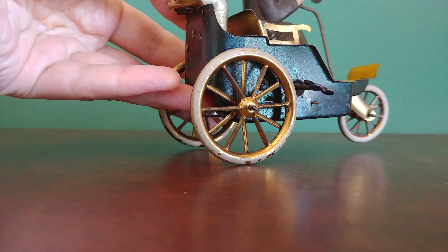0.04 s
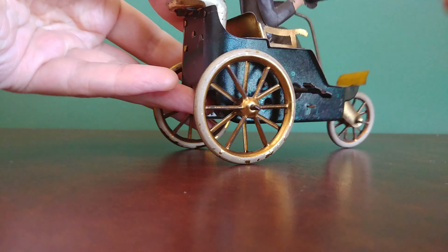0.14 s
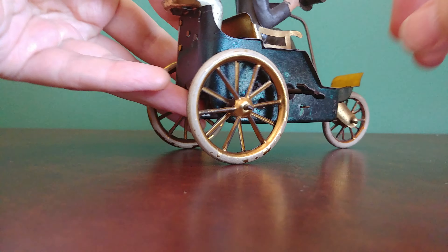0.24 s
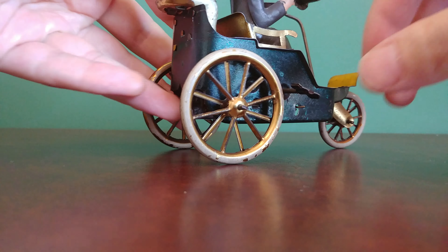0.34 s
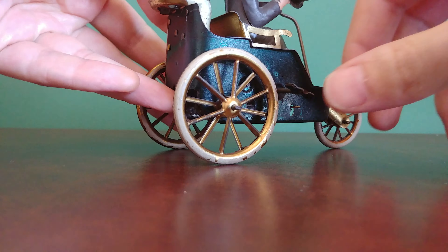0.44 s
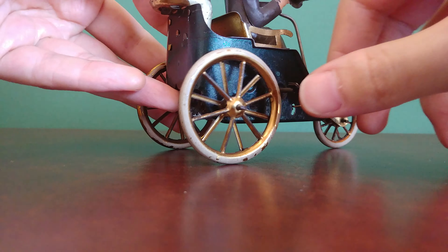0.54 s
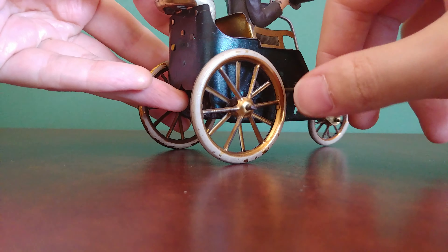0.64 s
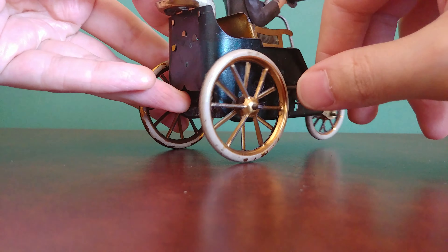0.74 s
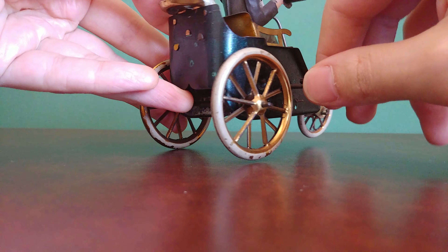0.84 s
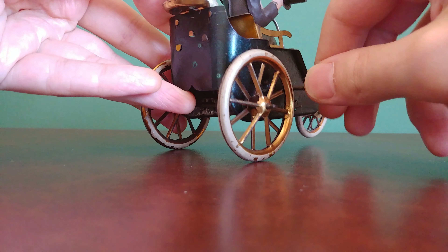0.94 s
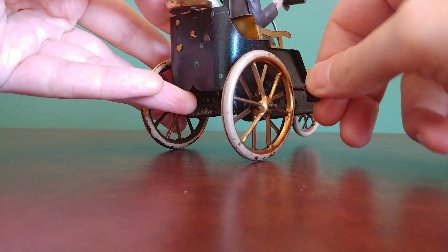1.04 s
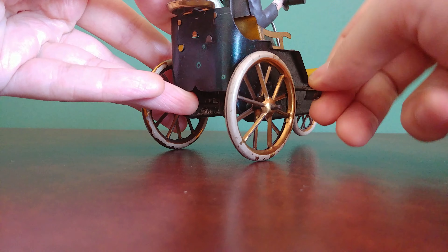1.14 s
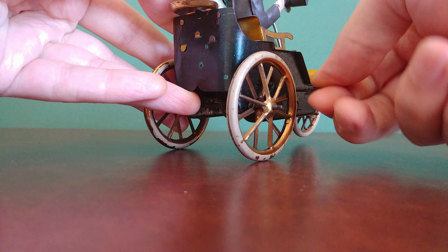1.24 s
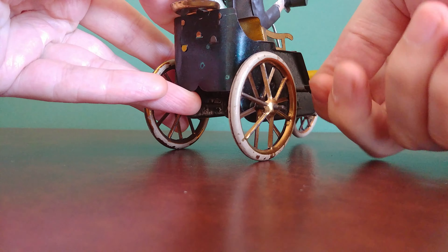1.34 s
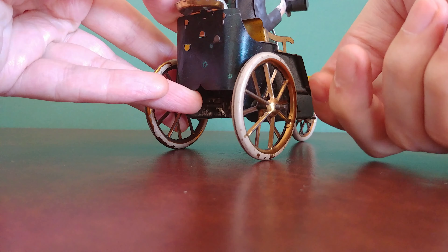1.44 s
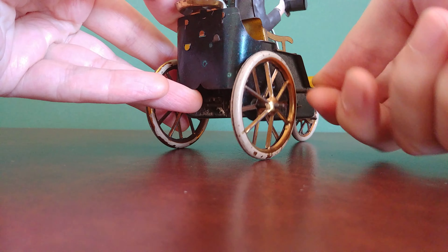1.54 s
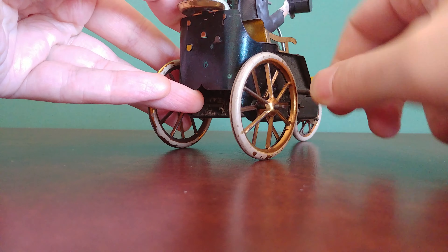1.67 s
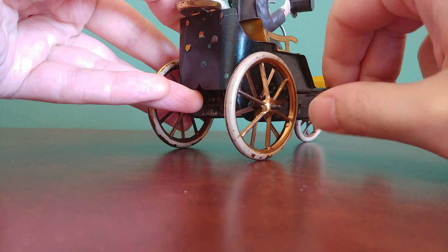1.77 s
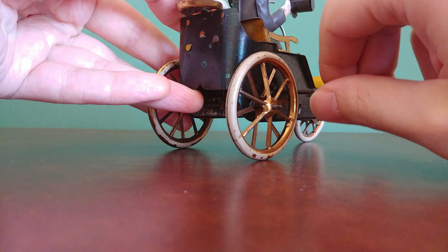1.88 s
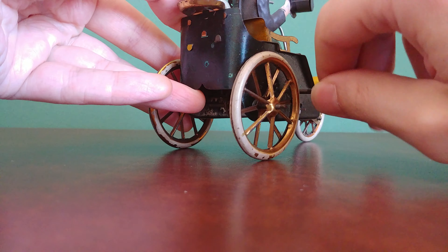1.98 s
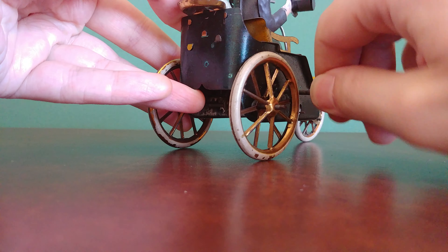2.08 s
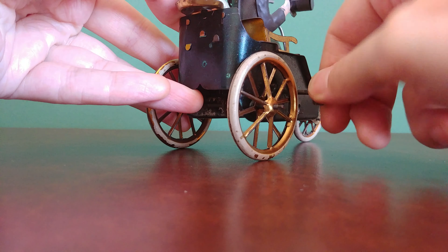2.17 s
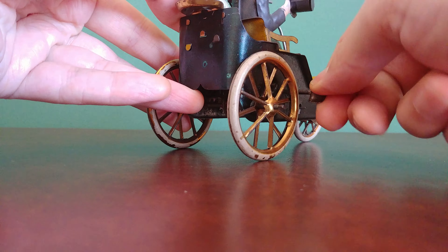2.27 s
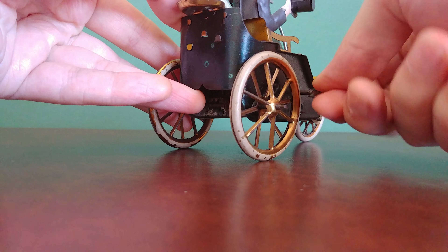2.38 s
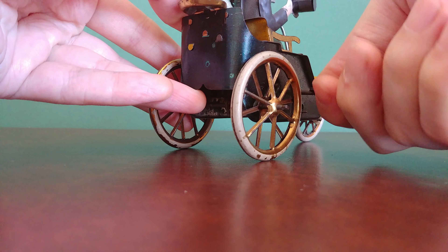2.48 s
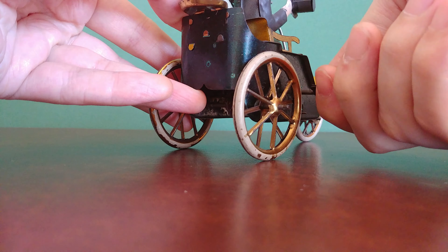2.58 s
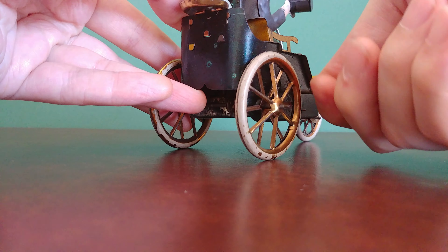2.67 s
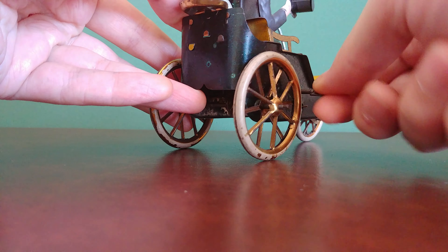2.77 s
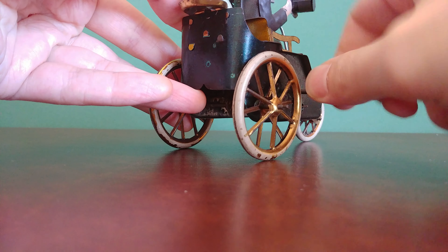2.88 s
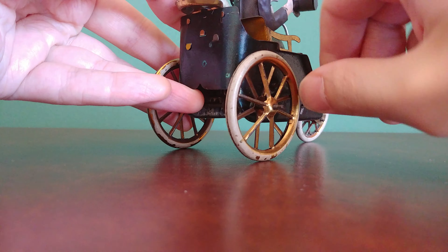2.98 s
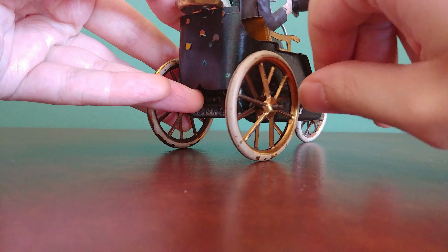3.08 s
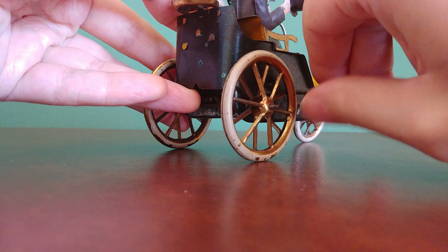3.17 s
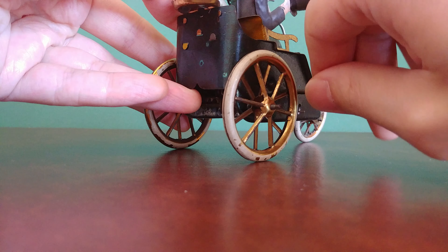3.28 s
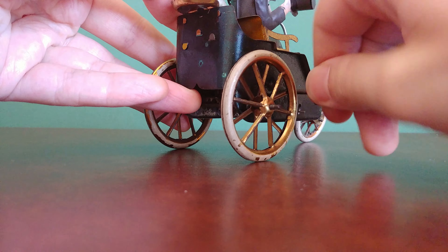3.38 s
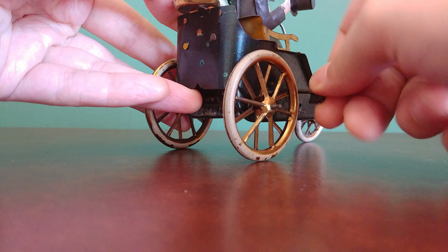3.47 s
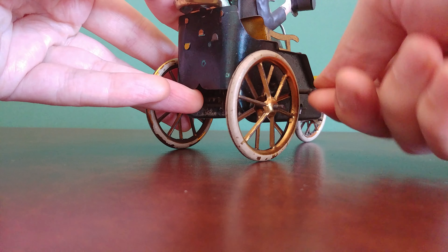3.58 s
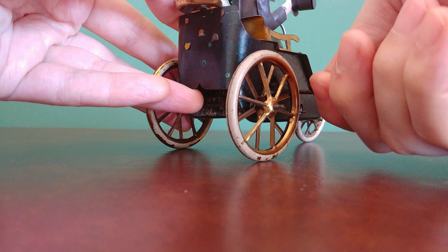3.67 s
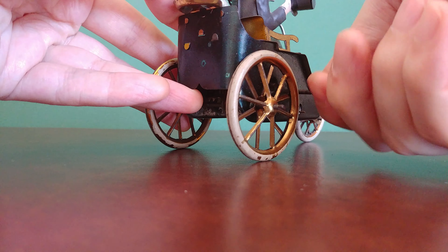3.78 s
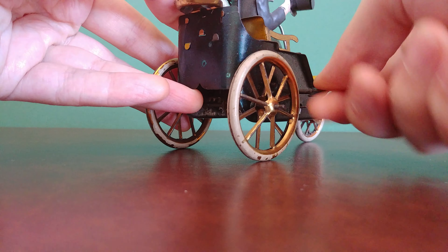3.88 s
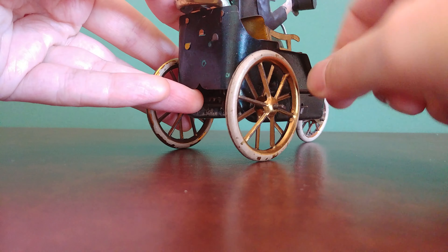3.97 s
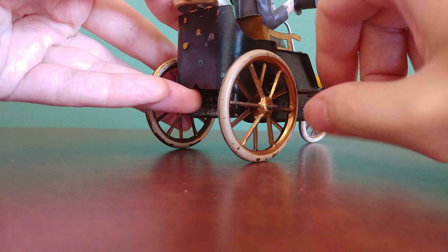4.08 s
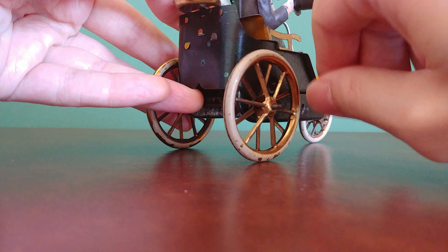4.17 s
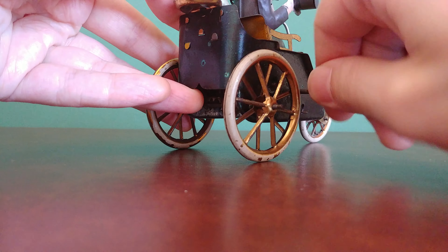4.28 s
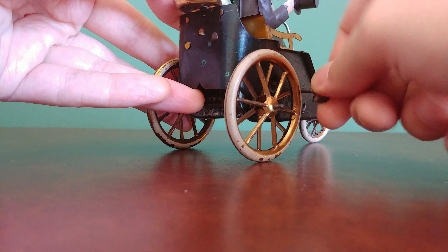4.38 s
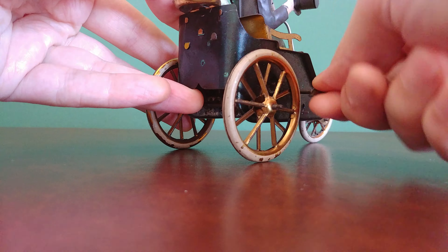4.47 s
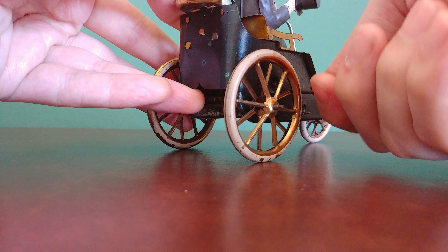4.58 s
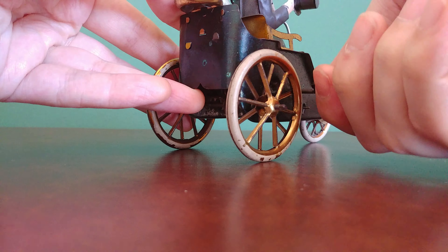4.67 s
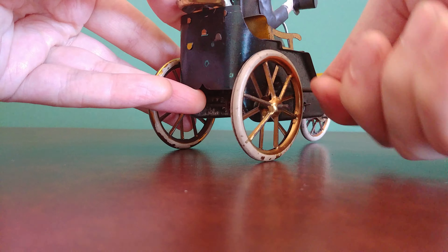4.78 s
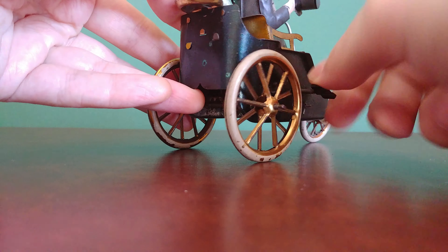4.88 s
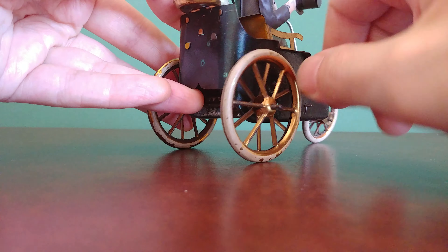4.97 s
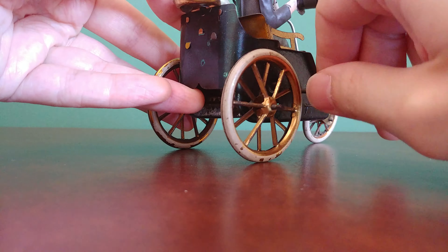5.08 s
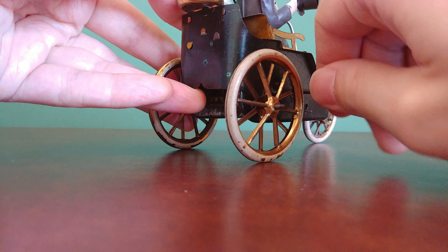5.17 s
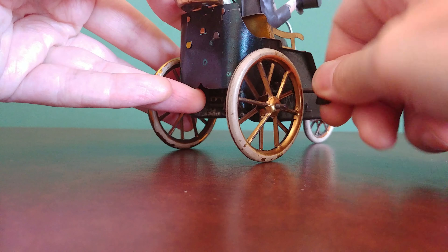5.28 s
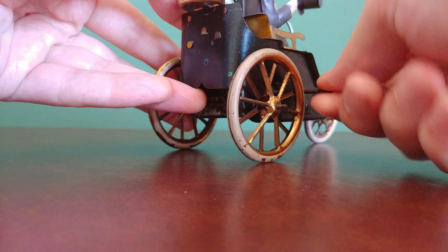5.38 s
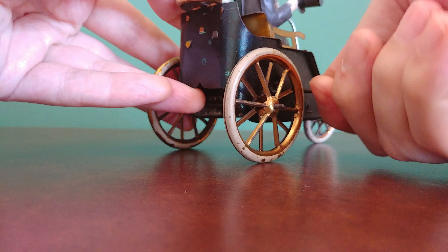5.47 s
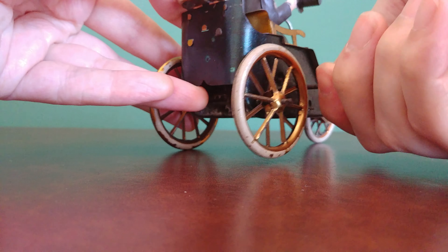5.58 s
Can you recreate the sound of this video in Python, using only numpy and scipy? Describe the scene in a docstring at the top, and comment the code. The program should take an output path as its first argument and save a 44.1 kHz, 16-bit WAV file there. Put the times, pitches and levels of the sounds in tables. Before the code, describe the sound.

Sharp ratchet clicks from a wind-up tin toy, turn after turn, with faint finger rubs, loose ticks and soft table thumps between.

```python
"""Winding up a tin toy car

A hand winds the clockwork of a small tin car that stands on a wooden table in a quiet room.
A pawl (a small catch) snaps over three or four ratchet teeth per turn; in between, fingers regrip
the key, rub the tin and make loose parts tick. Random tiny impacts ring the modes of the tin body.
Jolts ring low modes of the table; a wall echo and fading noise answer, over steady background noise.
Two close microphone ports round off the loudest peaks."""
import sys
import numpy as np
from scipy import signal
from scipy.io import wavfile

SR = 44100
rng = np.random.default_rng(int(sys.argv[2]) if len(sys.argv) > 2 else 0)


def file_out(sig):
    """Save sig as 16-bit WAV at sys.argv[1]."""
    # one column per channel
    cols = np.atleast_2d(sig).T
    # limit, then scale
    lim = np.clip(cols, -1, 1)
    pcm = np.round(lim * 32767).astype(np.int16)
    wavfile.write(sys.argv[1], SR, pcm)


N = 248283


def from_db(db):
    """Turn decibels into a gain."""
    return 10 ** (np.asarray(db) / 20)


def at_hz(points, hz):
    """Read a table of (f/Hz, value) between its points, on a log-frequency axis."""
    points = np.array(points, float)
    return np.interp(np.log(hz), np.log(np.maximum(points[:, 0], 1)), points[:, 1])


def bands(low_hz, count, per_octave):
    """Cut noise into adjacent bands: gives each centre in Hz and a pair of unrelated noises."""
    edges = low_hz * 2 ** (np.arange(count + 1) / per_octave)
    white = rng.standard_normal((2, 2, N))   # neighbouring bands take turns with two noise pairs
    for k, (low, high) in enumerate(zip(edges, edges[1:])):
        sos = signal.butter(2, [low, high], "band", fs=SR, output="sos")
        yield np.sqrt(low * high), signal.sosfilt(sos, white[k % 2])


# colour of the steady background: [f/Hz, relative level/dB per Hz]
BACKGROUND_COLOUR = [(18, -46), (30, -20), (125, 2), (212, -9), (378, -9), (1030, -20.5), (2220, -21),
                     (2470, -20.5), (2740, -25), (8090, -30.5), (10500, -70), (15200, -38.5),
                     (16500, -27.5)]
# how alike the background is in the two ports: [f/Hz, likeness from 0 to 1]
PORT_LIKENESS = [(100, 1), (500, 0.0082), (3000, 0.099)]
BACKGROUND_RMS_DB = -63.0   # before the microphone filters


def room_tone():
    """Steady noise mixed from a shared and an opposed part, so the ports agree mostly in the bass."""
    out = 0
    for hz, (mid, side) in bands(low_hz=28, count=28, per_octave=3):
        alike = at_hz(PORT_LIKENESS, hz)
        shared = np.sqrt(1 + alike) * mid
        opposed = np.sqrt(1 - alike) * side * [[1], [-1]]
        out = out + from_db(at_hz(BACKGROUND_COLOUR, hz)) * (shared + opposed)
    return from_db(BACKGROUND_RMS_DB) * out / np.sqrt(np.mean(out ** 2))


# time for the room's answer to fade by 60 dB: [f/Hz, t60/s]
ROOM_FADE = [(700, 0.22), (1800, 0.22), (4800, 0.27), (9000, 0.24), (14000, 0.16)]
# colour of the room's answer: [f/Hz, relative level/dB per Hz]
ROOM_COLOUR = [(240, -50), (400, -18), (1250, -18.5), (1530, -7.5), (3480, -1), (7580, -6), (10500, -20.5),
               (12500, -12.5), (15000, -10.5), (15700, -16.5), (16500, -44.5)]
# left port against right port, used in part here and in full for the tin: [f/Hz, level/dB]
LEFT_OVER_RIGHT = [(300, 1), (1300, 8.5), (2400, -2.5), (4400, 3.5), (8100, 11), (14000, 2)]
BUILD_UP_S = 0.0065


def room(rows, spread_db):
    """Scattered reflections of every strike: noise energy builds in a few ms and dies in each band."""
    out = 0
    at = (rows[:, 0] * SR).astype(int)
    level_db, brightness, room_db = rows[:, 1:].T
    colour_db = spread_db * rng.standard_normal((len(rows), 48))   # each strike is coloured differently
    for k, (hz, pair) in enumerate(bands(low_hz=400, count=48, per_octave=9)):
        strike_db = level_db + room_db + brightness * np.log2(hz / 4000)
        energy = np.full(N, 1e-18)
        energy[at] += from_db(strike_db + at_hz(ROOM_COLOUR, hz) + colour_db[:, k]) ** 2
        decay = from_db(-120 / (at_hz(ROOM_FADE, hz) * SR))   # energy, so twice the dB of amplitude
        build = np.exp(-1 / (BUILD_UP_S * SR))
        energy = signal.lfilter([1 - build], np.convolve([1, -decay], [1, -build]), energy)
        balance = from_db(0.4 * at_hz(LEFT_OVER_RIGHT, hz) * np.array([[1], [-1]]))
        out = out + np.sqrt(np.abs(energy)) * pair * balance
    return out


WALL_ECHO_S, WALL_ECHO_DB = 0.0081, -16.5


def wall(x):
    """One distinct echo from the wall just behind, with the ports swapped."""
    lag = int(WALL_ECHO_S * SR)
    return from_db(WALL_ECHO_DB) * np.pad(x[::-1], ((0, 0), (lag, 0)))[:, :N]


# hands shifting the toy on the table top: [t/s, relative level/dB]
HAND_THUMPS = [(0.087, -39.5), (0.16, -43.5), (0.34, -35.5), (1.396, -39.5), (1.448, -45), (1.57, -34.5),
               (1.728, -45), (1.998, -47.5), (3.259, -48), (3.869, -38.5), (4.558, -36.5), (4.861, -35.5),
               (5.544, -40.5)]
# low modes of the table top: [f/Hz, relative level/dB, t60/s]
TABLE_MODES = [(60, -28, 0.17), (110.4, -1.5, 0.11), (142.6, 2.5, 0.054), (239, -7, 0.073),
               (329, -10, 0.08), (490, -25, 0.035)]
JOLT_DELAY_S, PUSH_MS = 0.0021, 18   # jolt after its snap; time constant of the fading push


def table():
    """Each thump or jolt is a short uneven push that rings the low modes of the table top."""
    push, out = np.zeros(N), np.zeros((2, N))
    t = np.arange(SR // 4) / SR
    jolts = [(s + JOLT_DELAY_S, jolt_db) for s, _, jolt_db in PAWL_SNAPS]
    for s, level_db in HAND_THUMPS + jolts:
        at = int(s * SR)
        shape = (1 - np.exp(-t / 0.0028)) * np.exp(-t * 1000 / PUSH_MS) / np.sqrt(PUSH_MS)
        push[at:at + len(t)] += (from_db(level_db) * shape)[:N - at]
    for hz, mode_db, t60 in TABLE_MODES:
        r, w = from_db(-60 / (t60 * SR)), 2 * np.pi * hz / SR
        shared, own = rng.standard_normal((2, N))
        uneven = shared + 0.43 * own * [[1], [-1]]   # the ports sit over different spots of the board
        force = from_db(mode_db - 15.5) * push * uneven + 1e-18
        out += signal.lfilter([0, np.sin(w)], [1, -2 * r * np.cos(w), r * r], force)
    return out * from_db([[0.6], [-0.6]])


def impacts(per_s):
    """Random instants of impact, with a mean power of 1."""
    return (rng.random(N) < per_s / SR) * np.sqrt(SR / per_s)


# ringing modes of the tin body: [f/Hz, width/Hz, relative level/dB]
TIN_MODES = [(662, 33, -23.5), (1134, 1200, -33.5), (1518, 53, -10), (1657, 85, -4), (1987, 130, -0.5),
             (2447, 120, 4), (2790, 160, -0.5), (3190, 150, 1.5), (3642, 320, 4.5), (4270, 400, -1.5),
             (4616, 120, 4), (4800, 87, -7), (5310, 440, 3.5), (5730, 400, 4.5), (6323, 150, 2),
             (6877, 160, -2.5), (7510, 360, 2.5), (8020, 300, -3), (8586, 140, -4), (8950, 340, -5.5),
             (12100, 500, -11.5), (4220, 18, -16), (7260, 23, -13), (8100, 25, -12.5), (12300, 170, -13.5),
             (12400, 270, -14.5), (12600, 230, -4.5), (14300, 700, -23), (14700, 1600, -8)]
LEFT_LEAD_S = 0.00009   # the left port hears the toy a little earlier


def tin(force, brightness, spread_db, left_db, turn=0):
    """Each impact lands elsewhere and rings every mode of the body anew."""
    out = np.zeros((2, N))
    for k, (hz, width, mode_db) in enumerate(TIN_MODES):
        gain = from_db(mode_db + spread_db[k] + brightness * np.log2(hz / 4000))
        r = np.exp(-np.pi * width / SR)
        landing = force * gain * rng.standard_normal(N) + 1e-18
        ringing = signal.lfilter([np.sqrt(1 - r * r)], [1, -r * np.exp(2j * np.pi * hz / SR)], landing)
        # a mode radiates unevenly, so with turn its phase between the ports varies by event
        phase = np.pi * hz * LEFT_LEAD_S + turn * spread_db[k - 1]
        port = np.exp(1j * phase) * from_db((at_hz(LEFT_OVER_RIGHT, hz) + left_db) / 2)
        out += np.imag([ringing * port, ringing / port])
    # a small body radiates no bass
    return signal.sosfilt(signal.butter(2, 650, "high", fs=SR, output="sos"), out)


# fingers sliding on key and body: [centre t/s, swell length t/s, relative level/dB, loudest f/Hz]
FINGER_RUBS = [(0.313, 0.025, -53, 3000), (0.349, 0.015, -31.5, 1980), (0.67, 0.015, -54.5, 5360),
               (0.923, 0.019, -55, 1900), (1.039, 0.0052, -31.5, 4000), (1.42, 0.024, -39.5, 4700),
               (1.526, 0.025, -45, 3000), (1.607, 0.011, -47, 5500), (1.7, 0.023, -54.5, 5600),
               (2.119, 0.032, -55.5, 7770), (2.188, 0.0055, -51, 2000), (2.733, 0.013, -42.5, 5000),
               (2.824, .015, -57, 2500), (3.846, .02, -45, 4020), (4.895, 0.017, -36, 4920),
               (5.62, 0.013, -38, 4600)]


def rubbing():
    """Skin drags on the tin: swells of fine, faint impacts that favour the modes near one pitch."""
    t, rows = np.arange(N) / SR, np.array(FINGER_RUBS)
    swells = [from_db(level_db) * np.exp(-((t - s) / length) ** 2) for s, length, level_db, _ in rows]
    force = from_db(-6.5) * np.sum(swells, axis=0) * impacts(per_s=3800)
    loudest_hz = rows[np.argmax(swells, axis=0), 3]
    colour_db = [-14 * np.abs(np.log2(hz / loudest_hz)) for hz, _, _ in TIN_MODES]   # 14 dB per octave
    return tin(force, 0, colour_db, left_db=1.0)


RATTLE_DB, RATTLE_T60_S = -19.5, 0.11   # rattle level against the chatter, and its fade by 60 dB


def contacts(rows, per_s, rise_s, chatter_s):
    """Each event is a chatter of tiny impacts, then a dying rattle; also says which event is playing."""
    t = np.arange(N) / SR
    owner = np.maximum(np.searchsorted(rows[:, 0], t) - 1, 0)
    age = np.maximum(t - rows[owner, 0], 0)
    chatter = np.exp(-(age / chatter_s) ** 2)
    rattle = from_db(RATTLE_DB - 60 * age / RATTLE_T60_S)
    envelope = (1 - np.exp(-age / rise_s)) * (chatter + rattle)
    return from_db(rows[owner, 1]) * envelope * impacts(per_s), owner


def strikes(rows, level_db, spread_db, left_db, per_s, rise_s, chatter_s):
    """A list of contacts rings the tin body, each with a slightly different colour."""
    force, owner = contacts(rows, per_s, rise_s, chatter_s)
    colour_db = spread_db * rng.standard_normal((len(rows), len(TIN_MODES)))
    return tin(from_db(level_db) * force, rows[owner, 2], colour_db[owner].T, left_db, turn=0.21)


# key, wheels and loose tin under the fingers: [t/s, relative level/dB, brightness/dB per octave]
LOOSE_TICKS = [(0.0888, -45.5, -7.5), (0.1429, -35, 0.5), (0.171, -42, 5.5), (0.2059, -44, -1),
               (0.232, -40.5, -1.5), (0.2468, -45, -6), (0.2908, -37.5, -3), (0.3177, -41, -9.5),
               (0.3467, -30, 1.5), (0.503, -59, 9), (0.534, -59.5, 6), (0.594, -41.5, -4.5),
               (0.6533, -50.5, -7.5), (0.708, -50, 1), (0.8915, -54.5, 4), (0.9767, -52.5, -10.5),
               (1.415, -34.5, -1.5), (1.504, -37.5, -0.5), (1.5358, -37, -2.5), (1.5553, -27.5, 1.5),
               (1.5707, -26.5, -7), (1.6046, -33, -2.5), (1.671, -43, -1.5), (1.714, -34.5, 3.5),
               (1.845, -59, -1), (1.925, -59.5, -1), (1.9827, -31, -0.5), (1.9945, -32, 0.5),
               (2.637, -47, -2.5), (2.6487, -40, -0.5), (2.6642, -43.5, -7.5), (2.7284, -32.5, -1),
               (2.9162, -40.5, 3.5), (3.0462, -46.5, -0.5), (3.2445, -45, 0), (3.261, -29.5, -1.5),
               (3.8293, -39, -2), (3.8521, -23, -2), (3.865, -28.5, -1.5), (3.9669, -50, 3),
               (4.1561, -31, 1), (4.1908, -26.5, -1.5), (4.1991, -33, -0.5), (4.788, -40.5, 0),
               (4.867, -33, 7), (5.1436, -46, 7), (5.1639, -38, -5), (5.6015, -41, -4.5),
               (5.6125, -39.5, -5)]
TICK_ROOM_DB = -7.5


def tick_rows():
    """Ticks as rows of (t/s, relative level/dB, brightness/dB per octave, room against it/dB)."""
    return np.column_stack([LOOSE_TICKS, np.full(len(LOOSE_TICKS), TICK_ROOM_DB)])


def ticks(rows):
    """Loose parts touch: short chatters of impacts ring the tin."""
    return strikes(rows, level_db=-12.5, spread_db=3.0, left_db=0.0,
                   per_s=4700, rise_s=0.0005, chatter_s=0.0066)


# pawl over a tooth: [t/s, relative level/dB, relative level of the jolt into the table/dB]
PAWL_SNAPS = [(1.044, -6, -48), (1.161, -8, -42), (1.281, -9, -42), (2.1985, -3.5, -26.5),
              (2.2918, -6, -39.5), (2.4231, -6.5, -38.5), (3.352, -7, -42.5), (3.4313, -5.5, -48.5),
              (3.5076, -8, -48.5), (3.5907, -7, -36.5), (4.348, -4.5, -25.5), (4.4188, -6, -45.5),
              (4.5145, -6, -46), (4.6675, -6, -39), (5.2467, -5.5, -36.5), (5.3253, -4.5, -37),
              (5.402, -6.5, -36.5)]
PAWL_BRIGHTNESS_DB_PER_OCTAVE, PAWL_ROOM_DB = 0.8, -11.5   # for snaps with a weak jolt
# each dB of jolt above the knee adds this many dB of room, and dulls by this many dB per octave
SHAKE_KNEE_DB, SHAKE_ROOM_PER_DB, SHAKE_DULL_PER_DB = -36, 0.86, 0.1879


def pawl_rows():
    """Snaps as rows like the ticks; a strong jolt shakes the whole toy: duller, with far more room."""
    s, level_db, jolt_db = np.transpose(PAWL_SNAPS)
    shake = np.maximum(jolt_db - SHAKE_KNEE_DB, 0)
    brightness = PAWL_BRIGHTNESS_DB_PER_OCTAVE - SHAKE_DULL_PER_DB * shake
    return np.transpose([s, level_db, brightness, PAWL_ROOM_DB + SHAKE_ROOM_PER_DB * shake])


def pawl(rows):
    """The pawl snaps over ratchet teeth: dense, fast chatters of impacts ring the tin."""
    return strikes(rows, level_db=-12.0, spread_db=2.5, left_db=-1,
                   per_s=9000, rise_s=0.0004, chatter_s=0.0044)


def scene():
    """Toy and table with their room, over the background."""
    snaps, touches = pawl_rows(), tick_rows()
    toy = pawl(snaps) + ticks(touches) + rubbing()
    answer = room(np.vstack([snaps, touches]), spread_db=3.0)
    return toy + wall(toy) + table() + answer + room_tone()


PORT_DIP_HZ, PORT_DIP_WIDTH_HZ, PORT_DIP_SHARE = 10690, 1200, 0.62   # share: part of the peak removed
LIMIT, CUTOFF_HZ = 0.85, 17000   # limit: as a part of full scale


def record(dry):
    """The ports drop deep bass and dip in the treble, loud peaks are rounded off, the top is cut."""
    ports = signal.sosfilt(signal.butter(3, 46, "high", fs=SR, output="sos"), dry)
    peak = signal.iirpeak(PORT_DIP_HZ, PORT_DIP_HZ / PORT_DIP_WIDTH_HZ, fs=SR)
    dipped = ports - PORT_DIP_SHARE * signal.lfilter(*peak, ports)
    rounded = LIMIT * np.tanh(dipped / LIMIT)
    return signal.sosfilt(signal.cheby2(12, 70, CUTOFF_HZ, fs=SR, output="sos"), rounded)


dry = scene()
out = record(dry)
file_out(out)
```